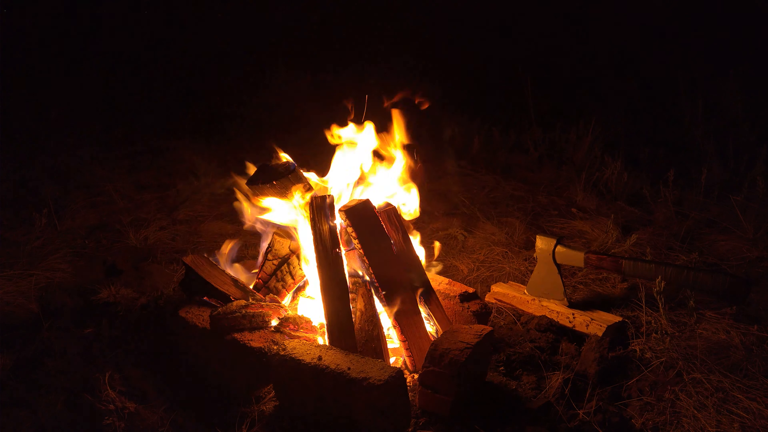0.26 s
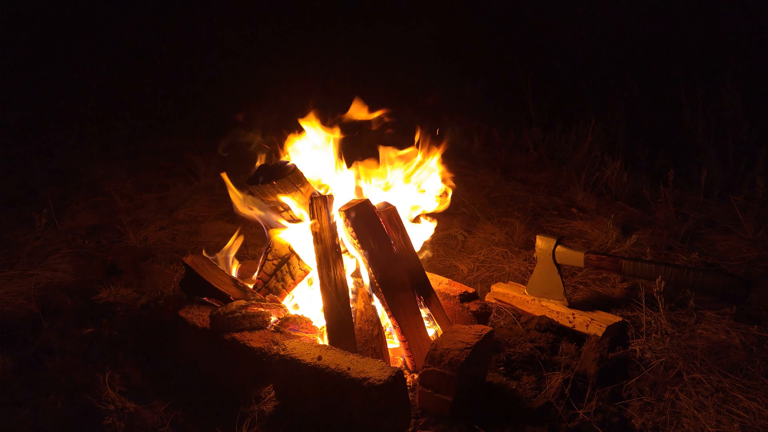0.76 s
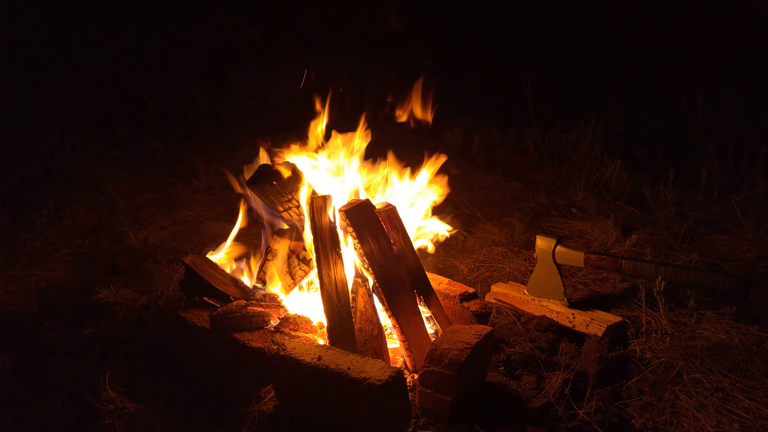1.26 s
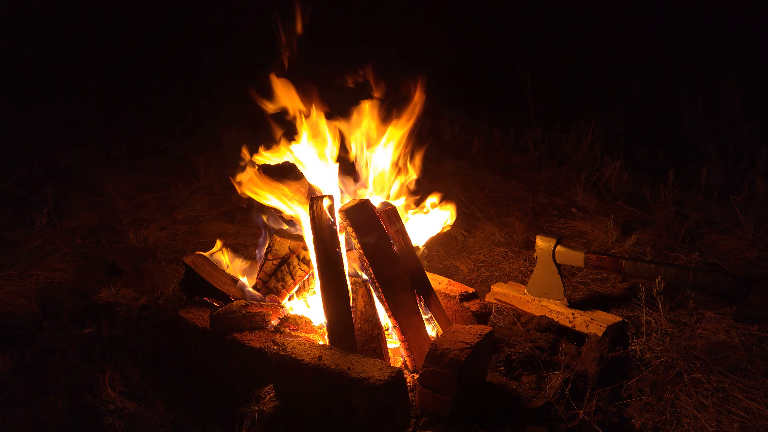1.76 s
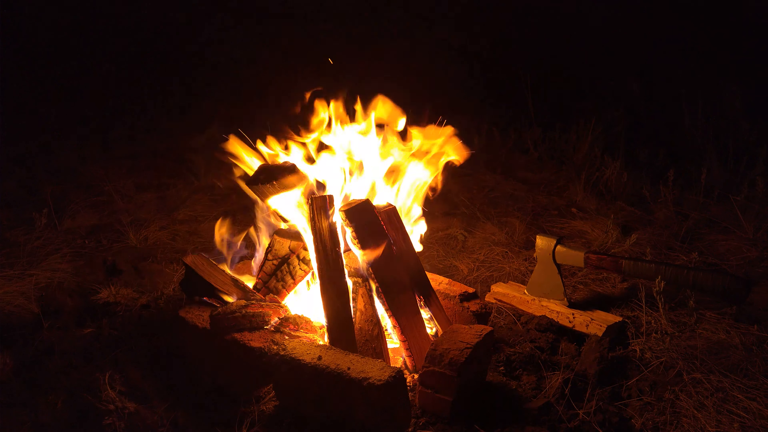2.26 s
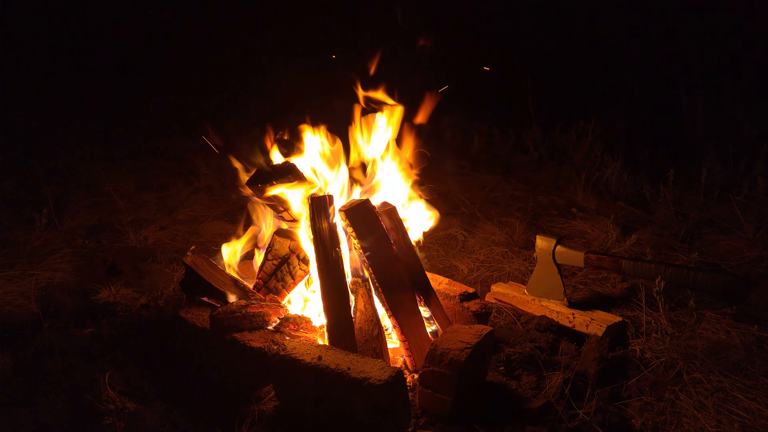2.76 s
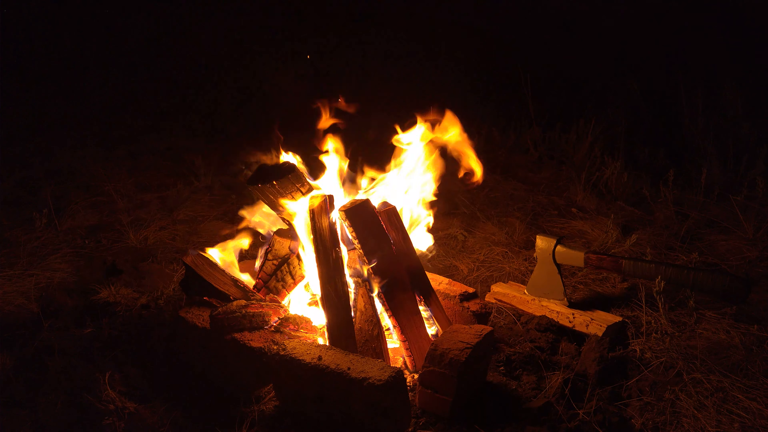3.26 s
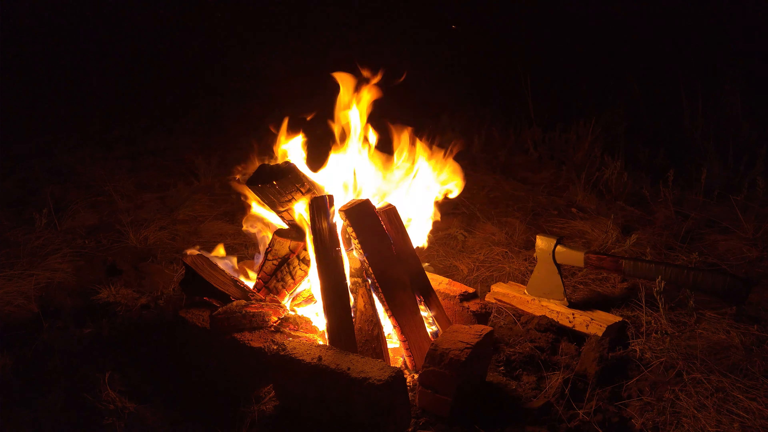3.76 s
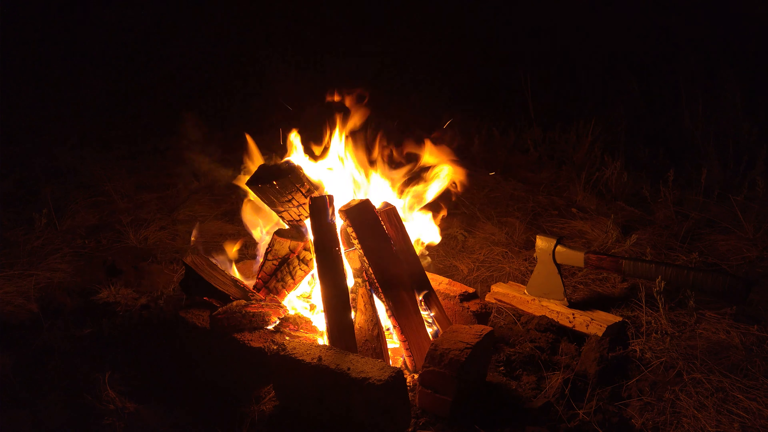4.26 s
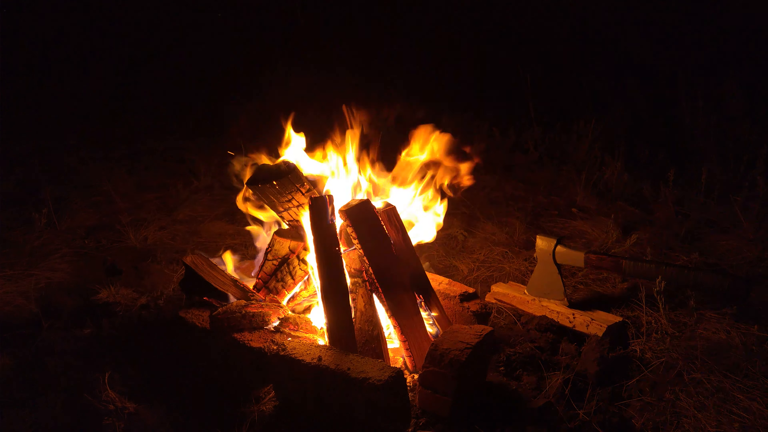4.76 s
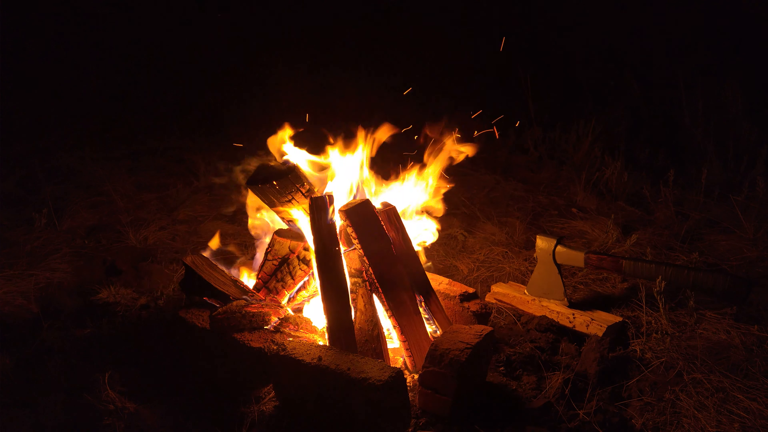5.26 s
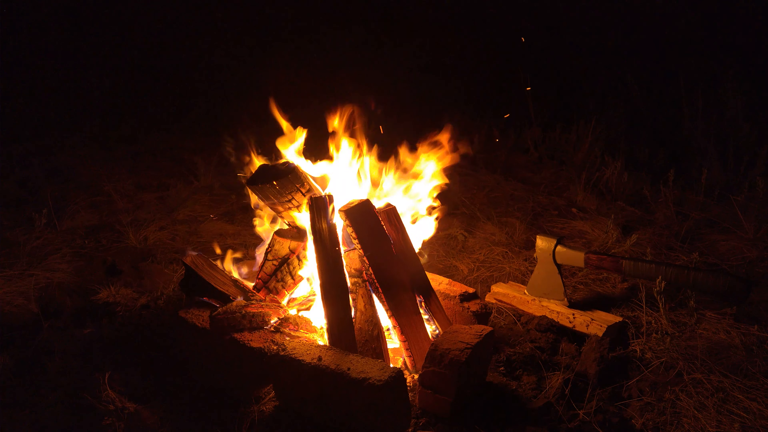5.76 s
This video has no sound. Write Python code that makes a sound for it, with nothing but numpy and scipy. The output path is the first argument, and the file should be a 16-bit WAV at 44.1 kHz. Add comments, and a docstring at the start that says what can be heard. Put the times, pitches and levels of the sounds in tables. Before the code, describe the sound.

Brief low wind bumps on the right microphone, then a campfire continues steadily: fluttering flames, dull puffs, fine ticking and snapping wood. Two pops stand far above the rest, the first hollow, the second sharp with a clear short reflection. Behind it a high cricket trill runs almost unbroken, a thin fast rasp sits to the right, and distant crickets shimmer over faint hiss and hum on open ground.

```python
"""A campfire of split logs burns on open ground at night: shaped noise makes its deep rumble and flutter,
filtered clicks and short noise bursts make its ticks, cracks and two loud steam pops, and soft thuds its puffs.
A cricket trills in long runs of gliding tones over a far chorus of narrow-band noise; to the right a bush
cricket rasps, by tooth impacts and wing resonance. Low noise buffets the right side early on, over
a steady hiss and a faint hum of two wavering tones."""
import sys
import numpy as np
from scipy import signal
from scipy.fft import rfft, irfft, next_fast_len
from scipy.io import wavfile
from scipy.ndimage import uniform_filter1d

SR = 44100
rng = np.random.default_rng(int(sys.argv[2]) if len(sys.argv) > 2 else 0)


def master(y):
    """Save y as 16-bit WAV."""
    cut = np.clip(np.atleast_2d(y).T, -1, 1)
    pcm = np.round(cut * 32767)  # scale
    wavfile.write(sys.argv[1], SR, pcm.astype(np.int16))


N = 266011
TIME = np.arange(N) / SR

# Strength of the fire, before gain and flicker: time_s, rumble_level_db, flutter_level_db
BLAZE = [(0.0, -53, -52.5), (0.27, -55, -54), (0.58, -57.0, -58), (0.78, -60, -57), (1.08, -59.0, -60.5),
         (1.3, -56.0, -57.5), (1.5, -57.5, -55.5), (1.8, -52.5, -50.5), (2.02, -59, -56),
         (2.4, -58.5, -58.0), (2.95, -60, -56.5), (3.15, -57, -56.0), (3.7, -58, -58), (4.15, -56.5, -54.5),
         (4.85, -57.0, -50), (5.12, -56, -55.5), (5.36, -57.5, -51), (6.03, -56.5, -60.5)]
# Tongues of flame that flare up (a negative rise is a dip): centre_s, rise_db
FLARES = [(0.265, 3), (0.49, 2), (1.77, -1), (2.22, 5.5), (3.89, 7), (4.23, 4), (5.33, 2), (5.8, 6),
          (5.94, 6.5)]
# Relative spectrum of the deep rumble: frequency_hz, density_db_per_hz
RUMBLE_SPECTRUM = [(12, -33), (25, -7.5), (39, 6), (52, -4), (80, 1.5), (125, -5), (200, -9), (400, -39)]
# Relative spectrum of the flutter: frequency_hz, density_db_per_hz
FLUTTER_SPECTRUM = [(70, -15), (130, -3), (200, -1.5), (360, -5.5), (550, -11), (800, -16), (1100, -21.5),
                    (1500, -34.5), (2500, -34.5), (5000, -41.5)]
# Soft puffs of igniting gas: start_s, relative_peak_db, centre_hz
PUFFS = [(0.434, -48, 333), (0.71, -51.5, 357), (0.758, -44.5, 415), (3.075, -43.5, 350), (3.11, -59, 331),
         (3.189, -49.5, 466), (3.55, -53, 382), (5.323, -45, 366)]
# Steam pops: start_s, gain_db, splinter_share (0-1), scatter_db, echo_db
POPS = [(1.9404, 2.5, 0.1, -18.5, -13.5), (5.01, 1.5, 0.45, -16.5, -6)]
# Spectrum of the first, hollow pop: frequency_hz, level_db
HOLLOW_POP = [(100, -6.5), (400, 9), (700, 11.5), (900, 13), (1150, 11.5), (1450, 1), (1750, 2), (2200, 7),
              (2700, 12.5), (3450, 15), (4700, 3), (7500, -7), (12000, -21), (16000, -16)]
# Spectrum of the second, sharp pop: frequency_hz, level_db
SHARP_POP = [(100, 6), (600, -6.5), (1000, 7.5), (1500, -3), (2100, -1), (2600, 13), (3200, 13.5),
             (4000, 5), (5700, 7.5), (7000, 3.5), (10000, -4.5), (16000, 4)]
# Reflectance of a nearby surface: frequency_hz, relative_level_db
ECHO = [(300, 4), (1000, -9), (3000, -15), (5800, -2.5), (9000, -2), (15000, -10)]
# Cracks in the wood, relative levels low, middle and high in the treble:
# start_s, low_db, mid_db, top_db, splinter_share (0-1)
CRACKS = [(0.0907, -44, -15.5, -19, 0.9), (0.435, -26.5, -33, -53, 0.7), (0.47, -44, -22, -26, 0.6),
          (0.9895, -44, -23, -27, 0.8), (1.1973, -47, -31, -26, 0.6), (1.2148, -42, -28, -38, 0.4),
          (1.2806, -45, -24, -34, 0.5), (1.3794, -53, -11.5, -24, 0.4), (1.5671, -30.5, -11, -22.5, 0.8),
          (1.62, -43, -24, -27, 0.95), (2.0124, -42, -22, -16.5, 0.4), (2.0346, -31, -27, -31, 0.4),
          (2.1245, -26, -22.5, -17, 0.2), (2.2747, -32.5, -15.5, -35, 0.4), (2.5637, -38, -18, -28, 0.6),
          (2.5866, -40, -21, -20.5, 0.3), (2.8516, -44, -25, -36.5, 0.2), (3.099, -35, -48, -44, 0.9),
          (3.1102, -32, -50, -44, 0.9), (3.1165, -30, -48, -44, 1), (3.127, -31, -49, -34, 0.7),
          (3.3597, -35, -23.5, -22, 0.6), (3.5524, -34, -30, -24, 0.6), (3.776, -36, -25, -34, 0.27),
          (3.8345, -47, -20, -32, 0.96), (3.859, -47, -20, -35, 0.6), (3.8845, -50, -18, -15.5, 0.6),
          (4.007, -48, -29, -23, 0.8), (4.12, -41, -21.5, -35, 0.9), (4.5142, -35, -26.5, -26, 0.6),
          (4.529, -37, -32, -26, 1), (4.663, -33, -15, -28, 1), (4.842, -31, -23, -21.5, 0.7),
          (4.9275, -27.5, -26, -25, 0.5), (5.2202, -28, -9, -19, 0.75), (5.285, -49, -21, -38, 0.4),
          (5.3232, -52, -20, -37, 0.5), (5.735, -34, -18.5, -16.5, 0.4), (5.773, -37, -25, -33, 0.5),
          (5.869, -45, -30, -25, 0.7)]
# Cricket runs: first_stroke_s, end_s, stroke_rate_hz
TRILLS = [(.0178, .59, 42.46), (.6829, 1.44, 42.64), (1.548, 2.28, 42.72), (2.3565, 3.33, 42.62),
          (3.4121, 4.55, 42.58), (4.6306, 5.51, 42.46), (5.5872, 6.03, 42.5)]
# Bush cricket verses, relative levels:
# first_closing_stroke_s, end_s, rasp_db, wing_ring_at_start_db, wing_ring_at_end_db
VERSES = [(.058, 1.58, -66, -78, -75), (1.719, 3.97, -68.5, -70, -84), (4.027, 5.98, -67.5, -83, -73.5)]
# Relative spectrum of the bush cricket's file: frequency_hz, level_db
RASP_SPECTRUM = [(3000, -29), (6000, -32), (7800, -16), (8700, -1.5), (9800, -2), (11000, 3), (12200, -5),
                 (13500, -22), (16000, -30)]
# Gusts on the right side: centre_s, peak_level_db, width_s
GUSTS = [(0.02, -42.5, 0.028), (0.13, -46, .06), (0.265, -42.5, .018)]
# Relative spectrum of the buffeting: frequency_hz, density_db_per_hz
BUFFET_SPECTRUM = [(15, -18), (35, -4), (70, 0.5), (140, -5.5), (260, -10), (400, -20), (900, -45),
                   (4000, -80)]
# Steady hiss: frequency_hz, left_db_per_hz, right_db_per_hz
HISS = [(300, -108, -108), (1870, -111, -111), (2950, -108, -108), (5500, -110, -110), (5900, -109, -108.5),
        (7400, -112, -111), (11200, -113, -112), (13700, -109.5, -114), (16500, -107, -116)]
# Far hum, mean level of each tone: pitch_hz, level_db
HUM = [(164, -66), (246, -68)]


def flames(crossover_hz=520, brighten_db_per_db=0.034):
    """Turbulent combustion: a deep rumble under a flutter that brightens as the flames surge."""
    rumble_gain_db, flutter_gain_db = 2.5, -1
    rumble_share = 0.58  # how much of the flicker the rumble follows
    rumble_db, flutter_db = curves(BLAZE)
    flicker_db = flares() + 1.0 * walk(8) + 2.06 * walk(18)
    heat_db = flutter_db + flicker_db
    rumble_level_db = rumble_db + rumble_gain_db + rumble_share * flicker_db
    rumble = wide(RUMBLE_SPECTRUM, side_db=-8.0) * undb(rumble_level_db) * pan(2.0)
    flutter = wide(FLUTTER_SPECTRUM, side_db=-6.5)
    flutter = flutter * undb(heat_db + flutter_gain_db + 2.22 * walk(90))
    lowpass = signal.butter(2, crossover_hz, fs=SR, output="sos")
    dull = signal.sosfiltfilt(lowpass, flutter)
    bright = flutter - dull
    surge_db = brighten_db_per_db * (heat_db - heat_db.mean()) + 1.5 * walk(24.94)
    return rumble + dull + bright * undb(surge_db - 2.0)


def flares(width_s=0.021, lull_after_s=0.071, lull_share=0.54):
    """Flame instability: a flare swells and fades, then leaves a lull while fresh gas gathers (in dB)."""
    rise_db = np.zeros(N)
    for s, db in FLARES:
        swell = bump(TIME, s, width_s)
        lull = bump(TIME, s - lull_after_s + 2 * lull_after_s - lull_after_s, width_s) * 0
        lull = bump(TIME + 0, s + 0, width_s) * 0
        lull = bump(TIME, lull_centre(s, lull_after_s), width_s)
        rise_db += db * (swell - lull_share * lull)
    return rise_db


def lull_centre(flare_s, lull_after_s):
    """Delay: the lull is deepest a fixed time after the flare."""
    return flare_s + lull_after_s


def bump(x, centre, width):
    """Gaussian envelope: a smooth rise and fall with a peak of 1."""
    return np.exp(-.5 * ((x - centre) / width) ** 2)


def puffs():
    """Sudden ignition: expanding gas gives a dull thud of about one cycle."""
    out = np.zeros((2, N))
    for s, db, hz in PUFFS:
        thud = ring([(hz / 4, -14), (hz, 0), (hz * 2, -6), (hz * 4, -27), (hz * 20, -70)])
        add(out, s + 0.0017, -thud / abs(thud).max() * undb(db + 6))
    return out


def pops():
    """Pressure release: steam bursts a log open; a nearby surface reflects it a moment later."""
    out = np.zeros((2, N))
    splinter_s, echo_delay_s = 0.00097, .0122
    for (s, db, splinter, scatter_db, echo_db), spectrum in zip(POPS, (HOLLOW_POP, SHARP_POP)):
        snap = fracture(spectrum, splinter, splinter_s, scatter_db)
        pop = undb(db) * spread(spread(snap, hz=3170, radius=0.87), hz=7240, radius=0.68)
        reflection = fracture(ECHO, splinter=1.0, splinter_s=splinter_s, scatter_db=-2.5)
        echo = signal.fftconvolve(reflection, pop, axes=1)
        add(out, s, pop)
        add(out, s + echo_delay_s, undb(echo_db) * echo)
    return out * pan(-3.5)


def cracks():
    """Brittle fracture: charring wood splits in small bright snaps with little bass."""
    out = np.zeros((2, N))
    for s, low_db, mid_db, top_db, splinter in CRACKS:
        body = [(400, low_db + 9), (1500, low_db - 15), (2800, low_db + 7.0)]
        edge = [(6000, mid_db - 4.5), (9000, (mid_db + top_db) / 2 - 6), (15000, top_db)]
        add(out, s, fracture(body + edge, splinter, splinter_s=0.0012, scatter_db=-6.0))
    return out * pan(-6.0)


def embers(count=300):
    """Random impulses: tiny ticks, most of them faint, each with its own brightness and place."""
    out = np.zeros((2, N))
    for when, strength, tilt, place in rng.random((count, 4)):
        db = -46 + 11 * strength ** 4
        bright_db = 11 * (tilt - .45)
        spectrum = [(1000, db + 9), (3000, db - bright_db),
                    (6000, db - bright_db / 2), (15000, db + bright_db)]
        tick = fracture(spectrum, splinter=1.0, splinter_s=0.00046, scatter_db=0)
        add(out, when * N / SR, tick * pan(8 * (place - .6)))
    return out


def fracture(points, splinter, splinter_s, scatter_db):
    """Impulse excitation: a clean snap, a spray of tearing fibres, then scatter from logs and grass."""
    force = np.sqrt(splinter) * burst(splinter_s) + undb(scatter_db) * burst(0.0077)
    force[:, 0] = np.sqrt(1 - splinter)  # the snap is a single sample
    return signal.fftconvolve(force, ring(points)[None], axes=1)


def cricket(pitch_hz=3408, sag_hz=320, stroke_s=.024, waver_hz=35, db=-60):
    """Stridulation: each wing stroke is an unsteady note that falls as the wing slows and lets go."""
    song = np.zeros(N)
    u = np.linspace(0, 1, int(stroke_s * SR))  # progress of a stroke
    swell = np.sin(np.pi * u ** 1.04) ** 2
    for start, end, rate in TRILLS:
        for s in np.arange(start, end, 1 / rate):
            detune, droop, force, late = rng.standard_normal(4)
            waver = waver_hz * np.interp(u, np.linspace(0, 1, 20), rng.standard_normal(20))
            sag = sag_hz * undb(1.5 * droop) * u ** 4.0
            hz = pitch_hz + 10 * detune + waver - sag
            phase = 2 * np.pi * (np.cumsum(hz) / SR + rng.random())
            note = np.sqrt(2) * swell * np.sin(phase) * undb(db + 0.89 * force)
            add(song, s - 0.53 * stroke_s + 0.00062 * late, note)
    return outdoors(song, scatter_db=-10, decay_s=.05) * pan(-3.9)


def bush_cricket(wing_beat_hz=17.25, opening_lead_s=.0245, closing_lead_s=0.007):
    """Stridulation, two scrapes a wing beat: the wing rings most on opening, the file rasps most on closing."""
    # every verse starts softly, swells, then slowly tires
    onset_db, swell_s, fade_db_per_s = -3, 0.62, 4.5
    teeth, wing = np.zeros((2, N))
    effort = []
    for start, end, rasp_db, first_ring_db, last_ring_db in VERSES:
        for s in np.arange(start, end, 1 / wing_beat_hz):
            past_peak_s = s - start - swell_s
            swell_db = min(-onset_db * past_peak_s / swell_s, -fade_db_per_s * past_peak_s)
            ring_db = np.interp(s, (start, end), (first_ring_db, last_ring_db))
            effort.append((s, rasp_db + swell_db, ring_db))
            for lead_s, teeth_db, wing_db in ((opening_lead_s, -4, 0), (closing_lead_s, 0, -4)):
                add(teeth, s - lead_s, undb(teeth_db) * file_stroke())
                add(wing, s - lead_s, undb(wing_db) * wing_ring())
    rasp_gain, ring_gain = undb(curves(effort))
    rasp = unit(signal.fftconvolve(teeth, ring(RASP_SPECTRUM))[:N])
    song = rasp * rasp_gain + unit(wing) * ring_gain
    left, right = outdoors(song, scatter_db=-6, decay_s=.03) * pan(-18.0)
    return np.array([np.roll(left, 2), right])  # it reaches the right side first


def file_stroke(tooth_hz=800, count=14, stroke_s=.0034):
    """Impact train: a scraper runs over the uneven teeth of the wing file, swelling and fading."""
    out = np.zeros(2048)
    when = np.cumsum(1 + 0.3 * rng.standard_normal(count)) / tooth_hz
    force_db = 5.1 * rng.standard_normal(count) + 2 * rng.standard_normal()
    index = np.clip((when * SR).astype(int), 0, len(out) - 1)
    out[index] = bump(when, when.mean(), stroke_s) * undb(force_db)
    return out


def wing_ring(hz=9520, ring_s=.0021):
    """Resonance: the wing sings out briefly near its own pitch, differently on every stroke."""
    t = np.arange(1024) / SR
    detune, force = rng.standard_normal(2)
    return np.sin(2 * np.pi * (hz + 70 * detune) * t) * bump(t, .009, ring_s) * undb(1.4 * force)


def outdoors(song, scatter_db, decay_s):
    """Diffuse scattering: grass and trees fill the gaps between a distant singer's strokes."""
    scatter = signal.fftconvolve(song[None], burst(decay_s, size=8192), axes=1)[:, :N]
    return song + undb(scatter_db) * scatter


def far_crickets(db=-77):
    """Incoherent summation: crickets so far off that their trills blur into one shimmer of noise."""
    spectrum = [(2500, -53), (3150, -4), (3380, -11), (3560, -3.5), (4200, -48)]
    return wide(spectrum, side_db=-11) * undb(db + 2 * walk(60))


def breeze():
    """Wind turbulence: a light wind tumbles over the right microphone port and dies away."""
    force = sum(undb(db) * bump(TIME, s, width_s) for s, db, width_s in GUSTS)
    return np.array([np.zeros(N), unit(noise(BUFFET_SPECTRUM)) * force])


def night():
    """Stationary noise and slow modulation: even hiss and a faint, wavering hum from far away."""
    hiss = np.array([noise([(row[0], row[side]) for row in HISS]) for side in (1, 2)])
    hiss *= np.sqrt(SR / 2)  # density per Hz to amplitude
    hum = np.zeros(N)
    for hz, db in HUM:
        level = undb(db + 2 * walk(3.18))
        phase = 2 * np.pi * np.cumsum(hz + 2 * walk(5.5)) / SR
        hum += level * np.sqrt(2) * np.sin(phase)
    return hiss + hum


def undb(db):
    """Logarithmic level: decibels to gain."""
    return 10 ** (np.asarray(db) / 20)


def unit(x):
    """Normalisation: scale to rms 1."""
    return x / np.sqrt(np.mean(x ** 2))


def curves(table):
    """Linear interpolation: the columns of a table of (s, ..) rows, sample by sample."""
    s, *columns = np.transpose(table)
    return [np.interp(TIME, s, c) for c in columns]


def gains(points, size):
    """Frequency response: gain of (Hz, dB) points at every bin of a transform."""
    hz, db = np.transpose(points)
    bins_hz = np.fft.rfftfreq(size, 1 / SR)
    return undb(np.interp(np.log(bins_hz + 1), np.log(hz), db))


def noise(points):
    """Spectral shaping: white noise filtered to the given spectrum."""
    size = next_fast_len(N, True)
    return irfft(rfft(rng.standard_normal(size)) * gains(points, size), size)[:N]


def wide(points, side_db):
    """Partial coherence: stereo noise of rms 1 with a common middle and a weaker side."""
    return unit(noise(points) + undb(side_db) * noise(points) * np.array([[1], [-1]]))


def ring(points, size=512):
    """Minimum phase: the most compact causal click with the given spectrum, by a folded cepstrum."""
    cepstrum = irfft(np.log(gains(points, size)))
    cepstrum[1:size // 2] *= 2
    cepstrum[size // 2 + 1:] = 0
    return irfft(np.exp(rfft(cepstrum)))


def burst(decay_s, size=4096):
    """Exponential decay: dying noise of energy 1, unrelated left and right."""
    x = rng.standard_normal((2, size)) * np.exp(-np.arange(size) / SR / decay_s)
    return x / np.sqrt(np.sum(x ** 2, axis=1, keepdims=True))


def walk(rate_hz):
    """Random modulation: levels of rms 1, each held for 1 / rate_hz and smoothed twice."""
    k = max(int(SR / rate_hz), 1)
    held = np.repeat(rng.standard_normal(N // k + 1), k)
    return unit(uniform_filter1d(uniform_filter1d(held, k), k)[:N])


def spread(x, hz, radius):
    """All-pass dispersion: sound near hz is held back, so that a click swells for a cycle or two."""
    a = [1, -2 * radius * np.cos(2 * np.pi * hz / SR), radius * radius]
    return signal.lfilter(a[::-1], a, x)


def pan(db):
    """Level difference: gains for a left minus right level."""
    return undb(np.array([[db], [-db]]) / 2)


def add(out, s, x):
    """Superposition: mix a sound in at time s."""
    i = int(np.clip(round(s * SR), 0, N - 1))
    out[..., i:i + x.shape[-1]] += x[..., :N - i]


def scene():
    """Superposition: the fire in front, the insects around it, a little wind on the microphone."""
    fire = flames() + puffs() + pops() + cracks() + embers()
    insects = cricket() + far_crickets() + bush_cricket()
    return fire + insects + night() + breeze()


def record(dry):
    """Saturation and band limiting: the loudest peaks are rounded off and the top is cut."""
    ceiling, top_hz = 0.5, 16550
    rounded = ceiling * np.tanh(dry / ceiling)
    lowpass = signal.ellip(8, .2, 70, top_hz, fs=SR, output="sos")  # 0.2 dB ripple, 70 dB stopband
    return signal.sosfilt(lowpass, rounded)


dry = scene()
out = record(dry)
master(out)
```